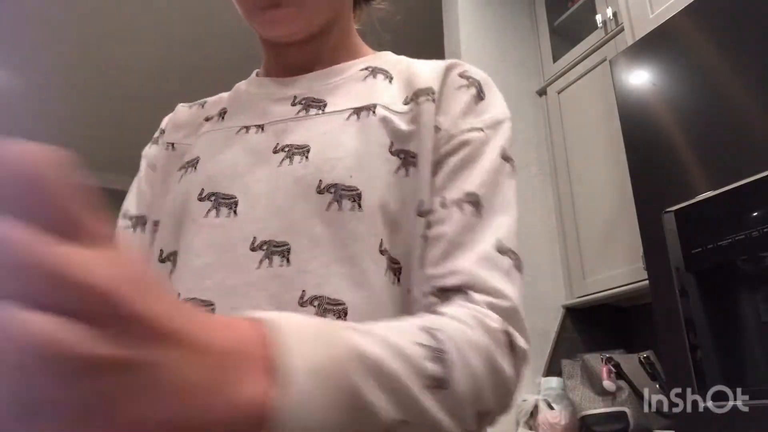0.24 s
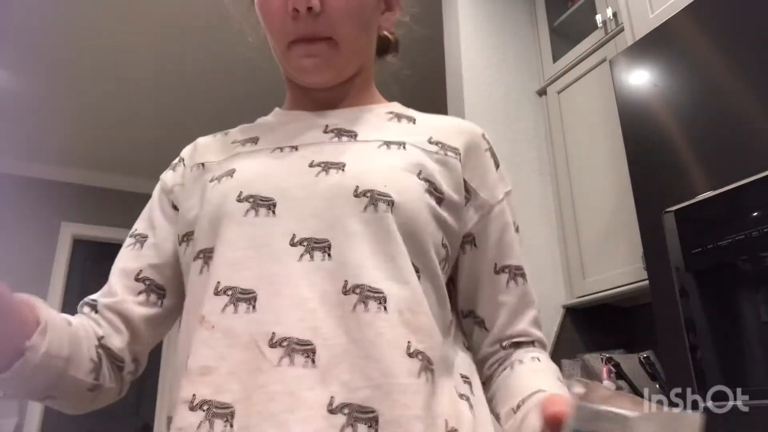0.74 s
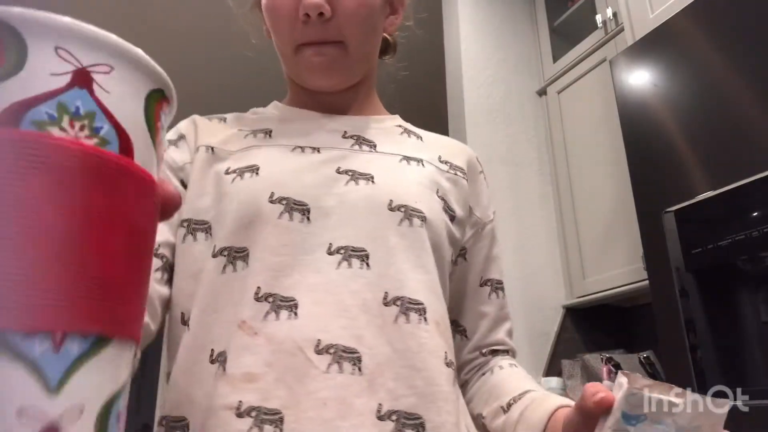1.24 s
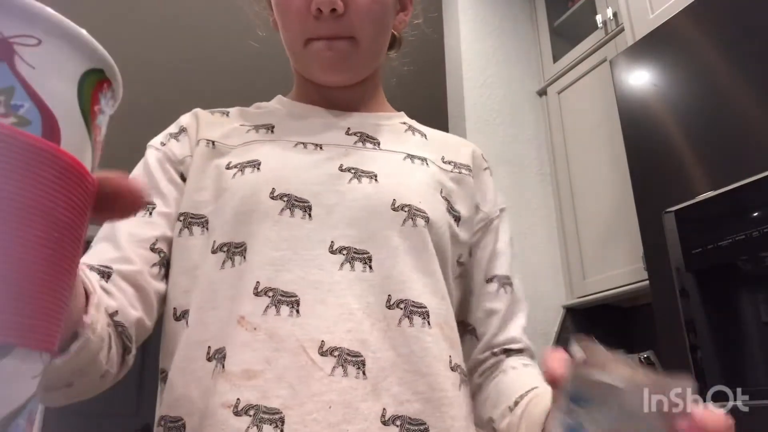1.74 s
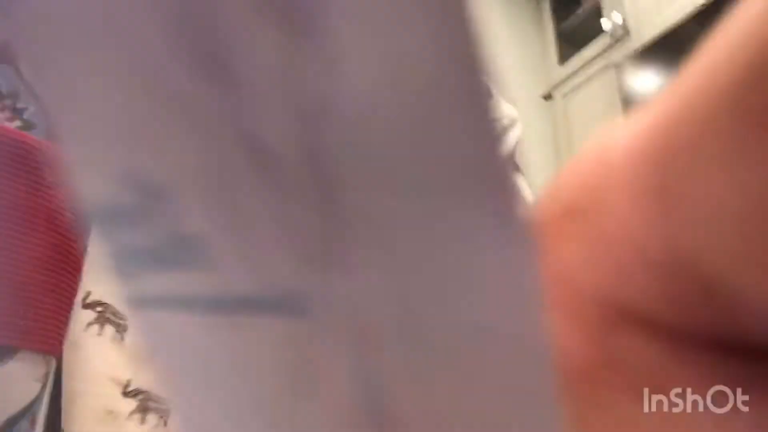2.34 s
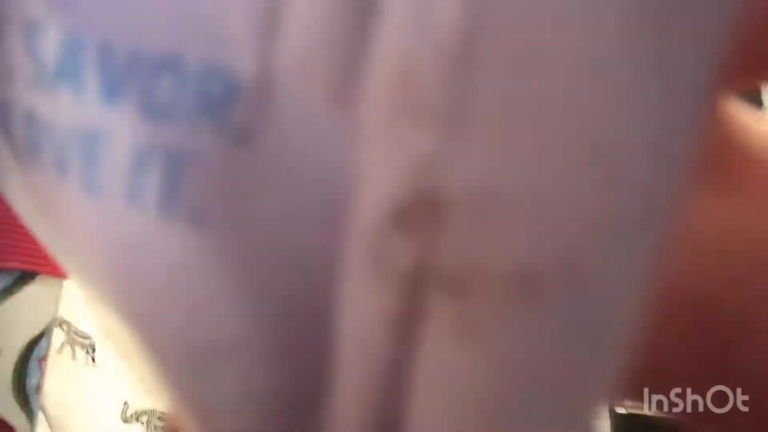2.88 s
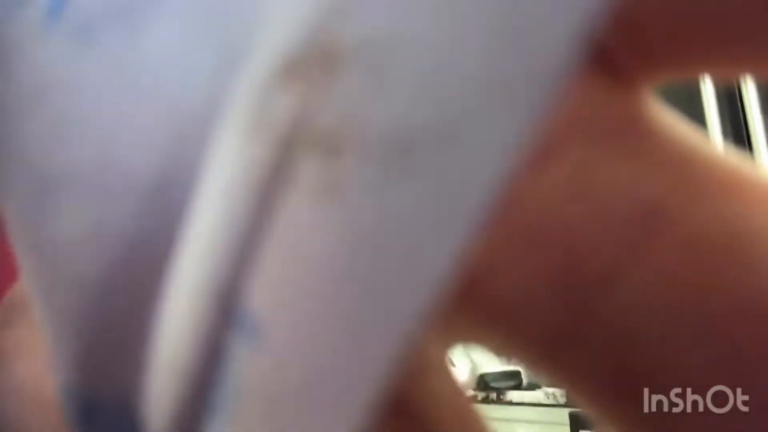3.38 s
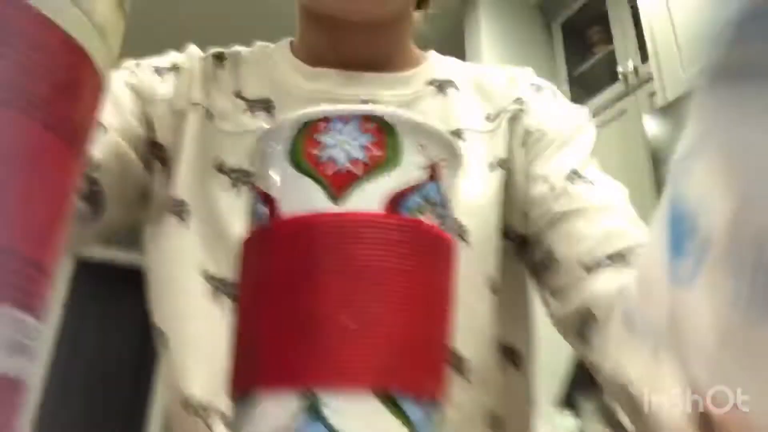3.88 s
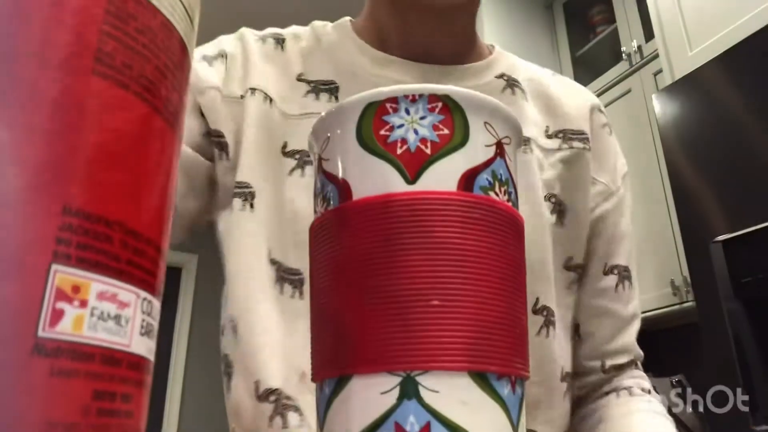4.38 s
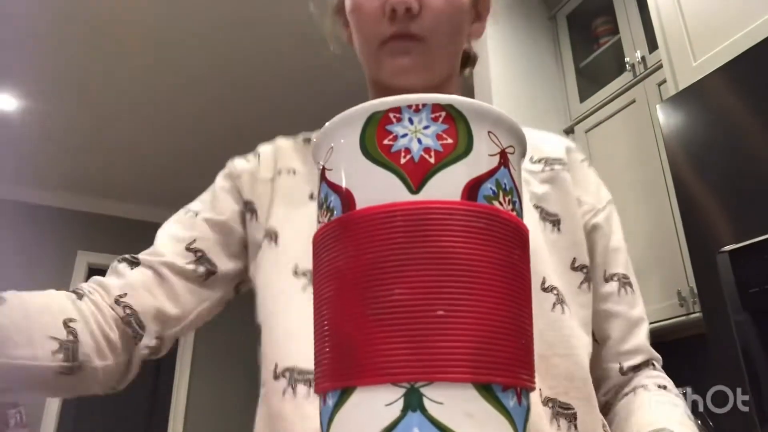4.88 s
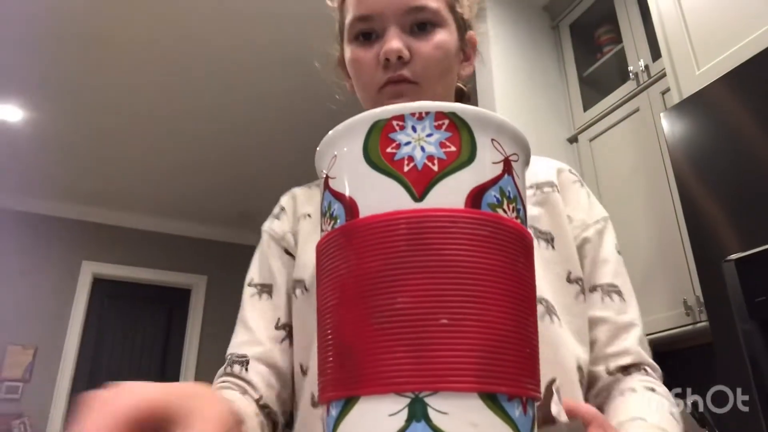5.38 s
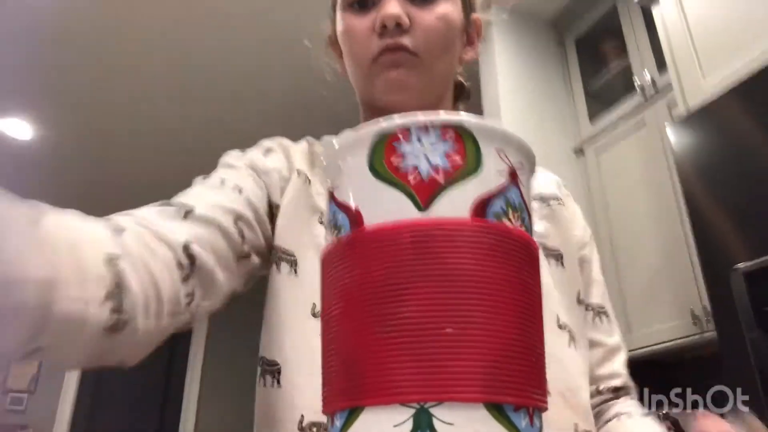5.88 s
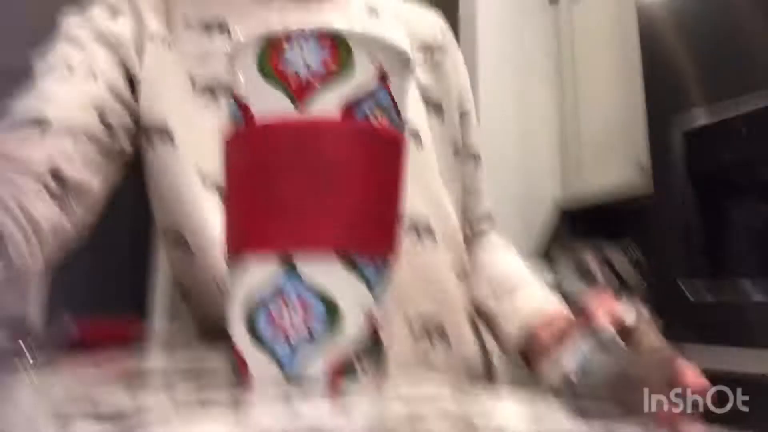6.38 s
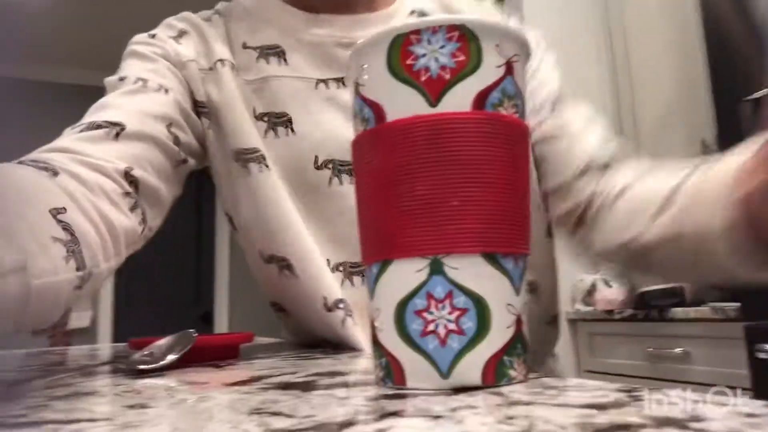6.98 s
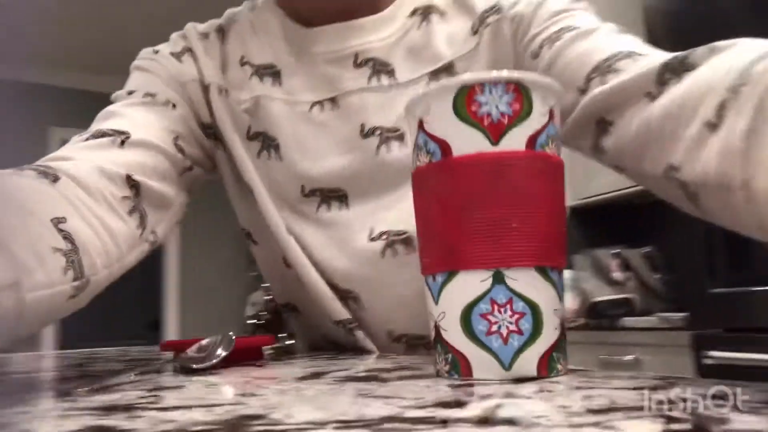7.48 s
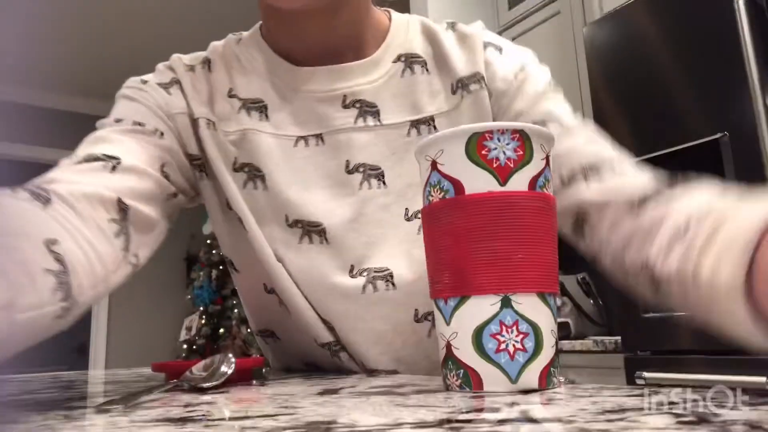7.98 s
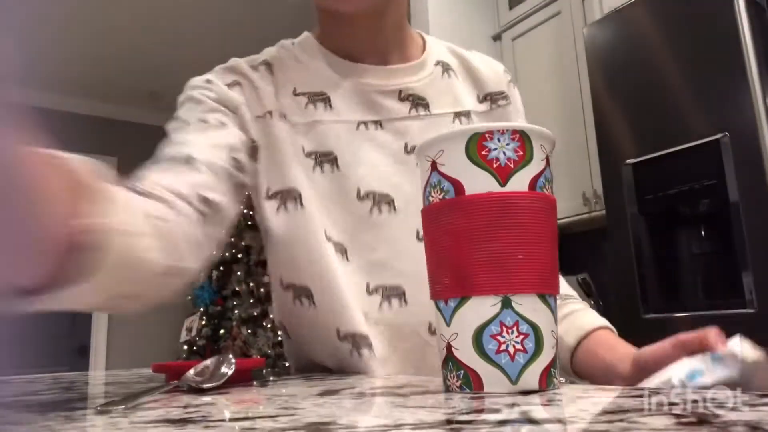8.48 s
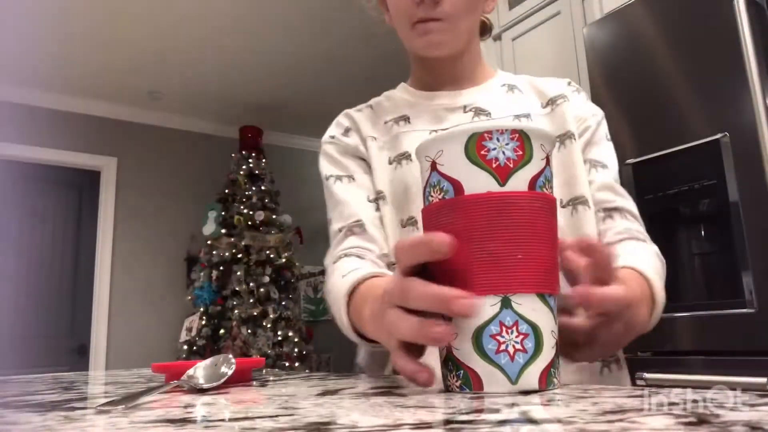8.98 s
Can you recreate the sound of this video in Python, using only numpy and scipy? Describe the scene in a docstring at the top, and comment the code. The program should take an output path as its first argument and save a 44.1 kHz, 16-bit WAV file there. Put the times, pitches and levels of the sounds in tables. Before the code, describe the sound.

A spoon chatters lightly and a ceramic mug is set on a stone counter with a double knock, ringing briefly in the kitchen. Close paper rustling follows, with sharp cracks and a crinkle. After a few more spoon clinks, the nearby microphone is gripped, knocked and shoved along the counter with dull thuds. A sharp tap and the faint scrape of the turning mug come last, over a steady low appliance hum.

```python
"""A stone kitchen counter with a phone as microphone close by; a low appliance hum, shaped noise, runs throughout.
A sleeve brushes past and a mug's foot scuffs, both grainy friction; a spoon clinks as chattering steel modes,
a tall ceramic mug knocks as damped modes over a low thud. Then a paper packet rubs, snapping at the microphone
as falling chirps and cracks. The phone is bumped and slid: case modes, friction and thuds. Last, the mug turns
on its foot and its rim sings faintly. Knocks and clinks ring in a hard room, a decaying noise tail."""
import sys
import numpy as np
from scipy import signal
from scipy.fft import rfft, irfft, next_fast_len
from scipy.io import wavfile

SR = 44100
rng = np.random.default_rng(int(sys.argv[2]) if len(sys.argv) > 2 else 0)


def int16_out(signal):
    """Quantize to a 16-bit WAV file."""
    q = np.round(np.clip(np.atleast_2d(signal).T, -1, 1) * 32767)
    wavfile.write(sys.argv[1], SR, q.astype(np.int16))


N = 407043  # length in samples

# Mug against stone. Each row: start in seconds, level in dB, upper edge of the sound in Hz.
MUG_KNOCKS = [(1.3354, -11.5, 5600), (1.359, -25, 2400), (1.4855, -17, 1760), (1.749, -48.5, 6040)]
# Resonances of the mug's body. Each row: frequency in Hz, level in dB, time to fall 60 dB in seconds.
MUG_MODES = [(518, -19, .08), (738, -14.5, .085), (945, -17, .06), (1292, -18, .06), (1410, 5, .0038),
             (1687, -13, .04), (2680, -5, .06), (5295, -22, .045)]
# Spoon contacts. Each row: start in seconds, ring level in dB, clack level in dB, span of the chatter
# in seconds, tilt of the ring in dB per octave.
SPOON_CLINKS = [(.83, -53, -52, .03, -5), (.872, -47, -48, .03, -3), (.907, -43, -37.5, .028, 0),
                (.984, -47, -42, .029, 3), (1.053, -53, -47, .028, 4), (1.336, -42, -34, .025, 0),
                (1.485, -48.5, -42.5, .016, 4), (5.303, -54, -47, .02, -3), (5.333, -48.5, -46, .014, -5),
                (5.369, -47, -45, .005, -5), (5.4327, -38, -30.5, .006, -9), (5.582, -43.5, -40.5, .012, 1)]
# Resonances of the steel. Each row: frequency in Hz, level in dB, time to fall 60 dB in seconds.
SPOON_MODES = [(3811, -4, .05), (5090, -1, .04), (5280, 0, .06), (6700, 0, .015), (7060, 4, .025),
               (9351, -7, .25), (10720, 0, .06), (12200, 2, .045), (13550, -6, .05)]
# Snaps of paper and fingers, soft taps and the body of two phone bumps. Each row: start in seconds,
# body level in dB, reference pitch of the body in Hz, crack level in dB.
SNAPS_AND_TAPS = [(0.732, -37.5, 486, -79), (2.4931, -18, 654, -38), (2.5827, -12, 760, -26),
                  (2.611, -21.5, 606, -50), (2.663, -15.5, 670, -26), (2.667, -15, 1260, -19),
                  (2.711, -22.5, 780, -52), (3.073, -24, 1260, -58), (3.2212, 3, 3300, -27),
                  (3.222, -16, 1000, -50), (3.252, -22, 560, -38), (3.3913, -2.5, 700, -21.5),
                  (3.421, -22.5, 560, -52), (3.693, -30, 1250, -37), (3.722, -24.5, 595, -22.5),
                  (3.7558, -1, 850, -11), (3.871, -25.5, 615, -29.5), (3.939, -31, 806, -13),
                  (3.98, -27, 693, -20), (4.066, -33, 1130, -16.5), (4.098, -43, 886, -16),
                  (4.28, -37, 900, -62), (4.596, -20, 1090, -38), (4.6403, -3.5, 1380, -23),
                  (5.243, -37.5, 350, -64.5), (5.969, -32.5, 700, -51), (6, -32.5, 630, -46),
                  (6.122, -25.5, 996, -56), (6.232, -36, 1010, -44), (6.362, -31.5, 900, -35),
                  (6.416, -20.5, 615, -50), (6.504, -31, 1290, -51), (6.646, -36, 990, -75),
                  (6.967, -21, 1200, -55), (7.014, -29.5, 835, -58), (7.1818, -20.5, 1300, -50),
                  (7.217, -16, 560, -45), (7.869, -25.5, 760, -63), (7.972, -22.5, 1140, -34),
                  (8.329, -30.5, 896, -38), (8.41, -36, 750, -64), (8.4884, -8, 1520, -33)]
# Phone against the things around it. Each row: start in seconds, body level in dB, clatter level in dB,
# span of the chatter in seconds.
PHONE_BUMPS = [(4.6396, -9.5, -19, 0.0086), (4.735, -17, -20.5, 0.013), (4.7578, -15, -16.5, 0.0073),
               (4.806, -53, -24.5, 0.0065), (7.21, -16.5, -25.5, 0.0088), (7.218, -14.5, -35, 0.013),
               (7.336, -31, -27, 0.0061), (7.366, -24, -22, 0.007), (7.464, -28.5, -31, 0.0072),
               (7.816, -42, -27, 0.014), (7.914, -24.5, -38, 0.005)]
# Resonances of the phone's case. Each row: frequency in Hz, level in dB, time to fall 60 dB in seconds.
PHONE_MODES = [(623, -6, 0.038), (715, -10, 0.04), (1084, -5.5, 0.011), (1390, -7, 0.0083)]
# Low thuds: hand pushes on the phone's case, and the bass of the first mug knock.
# Each row: start in seconds, level in dB, centre in Hz.
LOW_THUDS = [(1.337, -42.5, 150), (2.585, -37, 171), (2.668, -37, 112), (3.433, -38.5, 103.5),
             (3.473, -35.5, 155), (3.872, -42, 101.3), (4.624, -34.5, 153), (6.082, -41, 122.8),
             (6.422, -40.5, 101), (7.212, -27, 151), (7.916, -32, 138.5), (8.334, -46.5, 74)]

# Colours of rubbed paper, rubbed stone, the turning mug and the scuffing foot; then of the dry crack,
# the spoon's clack, the case's clatter, the mug's knock and the hum.
# Each row: frequency in Hz, relative level per Hz in dB.
PAPER_COLOUR = [(100, -1), (330, -2.5), (600, 4.5), (1600, -0.5), (4000, -12), (8500, -18.5), (16000, -35)]
STONE_COLOUR = [(90, -6), (620, 1.5), (1400, -1), (3000, -10), (9000, -21.5), (16000, -30.5)]
MUG_TURN_COLOUR = [(280, -10), (750, 1.5), (1150, -1), (2200, -25), (12000, -41.5)]
SCUFF_COLOUR = [(1300, -0.5), (2300, -16.5), (3050, 0.5), (5300, -5), (6200, -18), (12000, -32)]
CRACK_COLOUR = [(500, -5.5), (2000, -10.5), (7000, 0.5), (11000, -5.5), (16000, -14)]
CLACK_COLOUR = [(1300, -6), (5000, -3.5), (12500, -11), (16000, -26)]
CLATTER_COLOUR = [(200, 0), (2700, 7), (5000, -5.5), (9000, -9), (16000, -26)]
KNOCK_COLOUR = [(280, -9), (600, 8.5), (1800, 10), (2600, -3), (3800, -7), (6000, -19), (12000, -25.5)]
HUM_COLOUR = [(70, -9.5), (130, -8.5), (215, 2.5), (300, -4.5), (700, -8.5), (2000, -24), (8000, -30.5),
              (16000, -40)]

# Kitchen reverberation. Each row: frequency in Hz, level in dB, time to fall 60 dB in seconds.
KITCHEN_TAIL = [(148.9, -11, 0.99), (501, 2.5, 0.53), (1380, -8, 1), (3000, 1, 0.37), (12000, -4.5, 0.18)]
# Short noise rushes: touches, scuffs, crumples, ticks and a fading tail.
# Each row: start in seconds, level in dB, centre in Hz, time to fall 60 dB in seconds.
SWISHES = [(.476, -45, 4700, 0.095), (0.478, -40.5, 860, 0.065), (2.282, -41.5, 1210, 0.15),
           (3.644, -35, 4670, 0.042), (3.711, -40, 7550, 0.19), (3.761, -33.5, 6900, 0.046),
           (4.141, -43.5, 5540, 0.06), (6.167, -37, 12000, 0.0047), (6.71, -49.5, 2398, 0.32),
           (7.136, -53.5, 3550, 0.27), (8.025, -46, 2300, .16), (8.335, -53.5, 673, 0.98),
           (8.451, -56.5, 4730, 0.53), (8.49, -52, 1860, 0.48)]

# Strokes of the sleeve brushing past, the mug's foot scuffing as it is taken, the packet rubbing along # the
# phone, the packet crinkling as it is pulled away, the phone gripped, shoved and slid over the stone # (the
# rows at 6.69 and 6.91 s are faint crinkles of the packet further off), and the mug turning on its foot. # Each
# row: start in seconds, length in seconds, scrape level in dB, hiss in dB over the scrape, # catches in dB over
# the scrape.
SLEEVE_STROKES = [(0, 0.043, -59, 1, 22), (.16, 0.029, -66.5, 7, 10)]
SCUFF_STROKES = [(.485, 0.02, -56.5, 7, 0)]
PACKET_STROKES = [(2.42, 0.099, -53, -16, 26), (2.523, 0.092, -46, -2.5, 17), (2.665, 0.13, -44, -4.5, 16),
                  (2.82, 0.17, -48.5, -3, 18), (2.945, 0.05, -41.5, -6, 17), (3.085, 0.06, -43.5, -5, 17),
                  (3.17, .07, -46.5, -0.5, 18), (3.315, 0.044, -49, -3.5, 17),
                  (3.395, 0.052, -44.5, -7, 18)]
CRINKLE_STROKES = [(3.868, 0.2, -54, 0.81, 22)]
PHONE_STROKES = [(4.59, 0.13, -47.5, -3.5, 25), (4.68, 0.067, -39, -4, 13), (4.795, 0.081, -46, -4.5, 23),
                 (5.925, 0.085, -62.5, -14, 28), (6.1, 0.048, -50, -23.5, 23), (6.23, 0.38, -58.5, -17, 23),
                 (6.69, 0.11, -58.5, -6.5, 17), (6.91, 0.086, -58.5, -3.5, 27),
                 (7.22, 0.064, -48.5, -3, 18), (7.34, 0.14, -45, -3.5, 19), (7.49, 0.26, -52.5, 0, 17),
                 (7.69, 0.14, -47, -2, 18), (7.86, 0.12, -50, -9, 22)]
MUG_TURN_STROKES = [(9.04, 0.27, -56, -37, 0)]

HUM_DB = -59  # before its slow wander
TOP_HZ = 15900  # upper limit of the microphone
STROKE_ATTACK_S, STROKE_RELEASE_S = 0.0042, 0.42  # release: time to fall 60 dB
CATCHES_PER_S, FLUTTER_PER_S, SHIFTS_PER_S = 150, 150, 35


def undb(db):
    """Decibels to gain."""
    return 10 ** (np.asarray(db) / 20)


def unit(x):
    """Scale to rms 1."""
    return x / np.sqrt(np.mean(x ** 2) + 1e-20)


def clock(length):
    """Sample times of a short sound, in seconds."""
    return np.arange(int(length * SR) + 2) / SR


def fade(t, t60):
    """Exponential decay that falls 60 dB in t60 seconds."""
    return np.exp(-np.log(1000) * t / max(t60, 1e-4))


def add(track, s, sound):
    """Mix a sound in at s seconds."""
    i = max(int(s * SR), 0)
    track[i:i + len(sound)] += sound[:max(N - i, 0)]


def colour(x, points):
    """Shape a signal by (Hz, dB) points, causally, so that attacks stay sharp; rms 1."""
    hz, db = np.transpose(points)
    size = 2 * next_fast_len(len(x))
    f = np.maximum(np.fft.rfftfreq(size, 1 / SR), 1)
    skirts = np.minimum(np.minimum(f / hz[0], hz[-1] / f), 1) ** 2  # falls away beyond both ends
    log_gain = np.log(undb(np.interp(np.log(f), np.log(hz), db)) * skirts)
    cepstrum = irfft(log_gain)[:size // 2]  # keeping the causal half gives minimum phase
    response = np.exp(2 * rfft(cepstrum, size))
    return unit(irfft(rfft(x, size) * response)[:len(x)])


def band(x, lo, hi):
    """Keep one band, edges in Hz."""
    return signal.sosfilt(signal.butter(2, [lo, min(hi, SR / 2 - 1)], "band", fs=SR, output="sos"), x)


def burst(t, t60, points):
    """A coloured noise crack that dies away; its energy is set by the decay."""
    shape = fade(t, t60)
    return colour(rng.standard_normal(len(t)) * shape, points) * np.sqrt(np.mean(shape ** 2))


def ring(t, modes, scatter_db):
    """Decaying modes; each blow lands elsewhere and weights them anew."""
    out = 0
    for hz, db, t60 in modes:
        gain = undb(db + scatter_db * rng.standard_normal())
        out = out + gain * np.sin(2 * np.pi * hz * t) * fade(t, t60)
    return out


def chatter(blow, length, rebound, count=9):
    """A first contact and quick rebounds, weaker on average with time, share the level of one blow."""
    hits = np.zeros(len(clock(length)))
    late = rng.random(count)
    places = (late * (len(hits) - 1)).astype(int)
    hits[places] = rebound * rng.standard_normal(count) * (1 - late / 2)
    hits[0] = 1
    return unit(signal.fftconvolve(blow, hits)) * blow.std()


def walk(rate):
    """Smooth random wander with a spread near 1 and rate knots per second."""
    knots = rng.standard_normal(int(N / SR * rate) + 2)
    return np.interp(np.arange(N) / SR * rate, np.arange(len(knots)), knots)


def hum():
    """A low appliance hum: steady coloured noise whose level wanders slowly."""
    return undb(HUM_DB) * colour(rng.standard_normal(N), HUM_COLOUR) * undb(1.6 * walk(3.262))


def press(t, length):
    """Effort of one stroke: it builds up, holds while the hand moves, then dies away."""
    return np.clip(t / STROKE_ATTACK_S, 0, 1) * fade(np.maximum(t - length, 0), STROKE_RELEASE_S)


def shifting(x, depth_db):
    """The contact patch moves, so each octave swells and sinks on its own."""
    size = next_fast_len(len(x))
    octave = np.log2(np.clip(np.fft.rfftfreq(size, 1 / SR), 250, 16000) / 250)
    spectrum = rfft(x, size)
    out = 0
    for k in range(7):
        part = irfft(spectrum * np.maximum(1 - abs(octave - k), 0), size)[:len(x)]
        out = out + part * undb(depth_db * walk(SHIFTS_PER_S)[:len(x)])
    return out


def catches(t, per_s):
    """Fibres and grit catch and let go: tiny dry crackles at chance pitches, most of them weak."""
    out, short = np.zeros(len(t)), clock(.02)
    for when, pitch, size in rng.random((int(per_s * len(t) / SR), 3)):
        hz, i = 750 * 8 ** pitch, int(when * len(t))
        tick = size ** 3 * np.sin(2 * np.pi * hz * short) * fade(short, 4 / hz)
        out[i:i + len(short)] += tick[:len(t) - i]
    return out


def rub(strokes, points, grain_db, flutter_db, shift_db=2):
    """Friction: dense slips of uneven size and tiny catches; each stroke's effort drives all its parts."""
    start = max(int(strokes[0][0]), 0)
    t = start + clock(np.ceil(strokes[-1][0] + .5) - start)
    sizes = np.minimum(rng.exponential(size=len(t)), 2 * np.pi)  # rare giants are capped
    slips = rng.standard_normal(len(t)) * undb(grain_db * sizes)
    x = shifting(colour(slips, points), shift_db)
    low = signal.sosfiltfilt(signal.butter(2, 3000, fs=SR, output="sos"), x)
    scrape = low / band(x, 400, 2500).std()
    hiss = (x - low) / band(x, 3500, 12000).std()
    gains = np.zeros((3, len(t)))
    for s, length, db, hiss_db, catch_db in strokes:
        levels = undb([db, db + hiss_db, db + catch_db])
        gains = np.maximum(gains, np.outer(levels, press(t - s, length)))
    mix = 0
    for part, gain in zip((scrape, hiss, catches(t, CATCHES_PER_S)), gains):
        mix = mix + part * gain * undb(flutter_db * walk(FLUTTER_PER_S)[:len(t)])
    out = np.zeros(N)
    add(out, start, mix)
    return out


def sleeve():
    """The sleeve brushes past: grainy, strongly fluttering friction."""
    return rub(SLEEVE_STROKES, PAPER_COLOUR, grain_db=4.0, flutter_db=5.0)


def kitchen(x):
    """Hard walls and cupboards: a dense tail in octave bands, dying fastest in the treble."""
    t, (hz, db, t60) = clock(0.93), np.transpose(KITCHEN_TAIL)
    tail = 0
    for centre in 125 * 2. ** np.arange(8):
        gain_db, decay = (np.interp(np.log(centre), np.log(hz), c) for c in (db, t60))
        octave = band(rng.standard_normal(len(t)), centre / np.sqrt(2), centre * np.sqrt(2))
        tail = tail + undb(gain_db) * octave * fade(t, decay)
    tail = tail * (1 - np.exp(-t / 0.0037))  # the reflections build up first
    return signal.fftconvolve(x, tail / np.linalg.norm(tail))[:N]


def swishes():
    """Brief noise rushes around one broad resonance: touches, scuffs, crumples, ticks, a dying tail."""
    out, t = np.zeros(N), clock(0.28)  # longer decays are cut here
    for s, db, hz, t60 in SWISHES:
        points = [(hz / 5, -14), (hz / 2, -13), (hz * .75, -1), (hz, 0), (hz * 2, -20), (hz * 4, -29)]
        add(out, s, undb(db) * burst(t, t60, points))
    return out


def scuff():
    """The mug's foot scuffs the stone: bright, even friction."""
    return rub(SCUFF_STROKES, SCUFF_COLOUR, grain_db=0, flutter_db=2.5)


def flex(t, hz):
    """A thin wall springs back: a few cycles falling in pitch, as short bending waves arrive first."""
    cycles = hz * t
    phase = .7 * cycles + 1.1 * (1 - np.exp(-cycles / 1.3))  # from about 1.5 to 0.7 times hz
    return np.sin(2 * np.pi * phase) * (1 - np.exp(-cycles / .6)) * fade(t, 7.5 / hz + .002)


def snaps():
    """Snaps, taps and bump bodies: a falling chirp with a rustle of noise, under a sharp crack."""
    out, t = np.zeros(N), clock(0.09)
    for s, db, hz, crack_db in SNAPS_AND_TAPS:
        rustle = burst(t, 12 / hz, [(hz / 4, -8), (hz, 0), (hz * 2, -5), (hz * 8, -26)])
        body = flex(t, hz) + 0.24 * rustle
        crack = burst(t, 0.0036, CRACK_COLOUR)
        add(out, s, undb(db) * body + undb(crack_db) * crack)
    return out


def spoon():
    """Steel chatters on a hard surface; the spot that touches favours its low or its high modes."""
    out, t = np.zeros(N), clock(0.31)
    for s, ring_db, clack_db, length, tilt_db in SPOON_CLINKS:
        modes = [(hz, db + tilt_db * np.log2(hz / 7000), t60) for hz, db, t60 in SPOON_MODES]
        steel = undb(ring_db) * ring(t, modes, scatter_db=1.5)
        clack = undb(clack_db) * burst(t, .025, CLACK_COLOUR)
        add(out, s, chatter(steel + clack, length, rebound=.79, count=16))
    return out


def mug():
    """The mug's foot hits the stone: body modes and a clack; each knock has its own upper edge."""
    out, t = np.zeros(N), clock(0.13)
    for s, db, top_hz in MUG_KNOCKS:
        blow = ring(t, MUG_MODES, scatter_db=0.5) + undb(-9.5) * burst(t, 0.13, KNOCK_COLOUR)
        add(out, s, undb(db) * band(blow, 350, top_hz))  # a small body radiates little bass
    return out


def thuds():
    """Low, ragged noise thuds: the first mug knock's bass, then hand pushes on the phone's case."""
    out, t = np.zeros(N), clock(0.23)
    for s, db, hz in LOW_THUDS:
        add(out, s, undb(db) * burst(t, 0.15, [(hz / 2, -5), (hz, 0), (hz * 2, -9), (hz * 8, -40)]))
    return out


def packet():
    """Paper rubs along the phone: friction with unevenly sized slips."""
    return rub(PACKET_STROKES, PAPER_COLOUR, grain_db=3.8, flutter_db=3.2, shift_db=3.2)


def crinkle():
    """The packet is pulled away: friction with the bright colour of a crack."""
    return rub(CRINKLE_STROKES, CRACK_COLOUR, grain_db=3.5, flutter_db=3)


def phone_slide():
    """The phone is gripped, shoved and slid over the stone, and the packet crinkles faintly further off:
    steadier friction with finer grain."""
    return rub(PHONE_STROKES, STONE_COLOUR, grain_db=2.6, flutter_db=1.5, shift_db=2.5)


def bumps():
    """The phone's case judders against a hard edge: its modes and a clatter, in quick rebounds."""
    out, t = np.zeros(N), clock(0.26)
    for s, db, clatter_db, length in PHONE_BUMPS:
        case = undb(db) * ring(t, PHONE_MODES, scatter_db=1.5)
        clatter = undb(clatter_db) * burst(t, 0.019, CLATTER_COLOUR)
        blow = band(case + clatter, 470, TOP_HZ)  # the small case radiates little bass
        add(out, s, chatter(blow, length, rebound=0.62))
    return out


def mug_turn():
    """The foot grinds on the stone and keeps the rim's two highest modes faintly singing."""
    grind = rub(MUG_TURN_STROKES, MUG_TURN_COLOUR, grain_db=4.0, flutter_db=4.5)
    rim = signal.fftconvolve(grind, ring(clock(.2), MUG_MODES[-2:], scatter_db=0))[:N]
    return grind + undb(-19) * grind.std() * unit(rim)


def scene():
    """Knocks and clinks excite the room; rubs, swishes, thuds and bumps only weakly; snaps stay dry."""
    clinks, knocks = spoon(), mug()
    far = sleeve() + swishes() + scuff() + mug_turn()
    near = thuds() + packet() + crinkle() + phone_slide() + bumps()
    dull_knocks = band(band(knocks, 200, 2300), 200, 2300)  # twice, for steeper edges
    send = undb(-8.0) * dull_knocks + undb(-9) * clinks + undb(-19.0) * far + undb(-20.5) * near
    return (hum() + knocks + clinks + far + near + snaps() + kitchen(send))[None]


def record(dry):
    """The phone thins the deep bass, rounds the loudest peaks and cuts the top."""
    thin = signal.sosfilt(signal.butter(2, 55, "high", fs=SR, output="sos"), dry)
    rounded = np.tanh(thin)
    return signal.sosfilt(signal.ellip(8, .2, 70, TOP_HZ, fs=SR, output="sos"), rounded)


dry = scene()
out = record(dry)
int16_out(out)
```